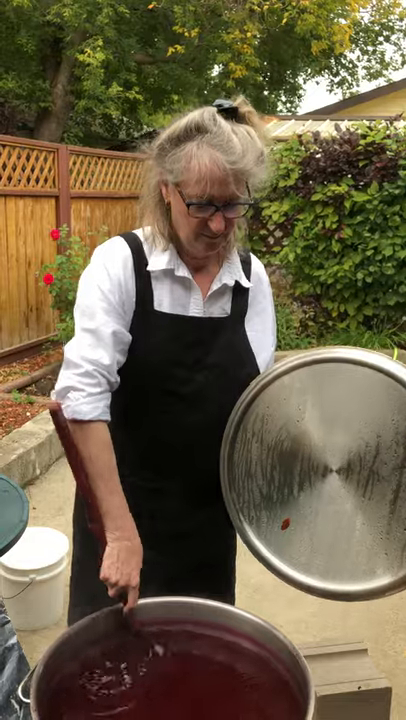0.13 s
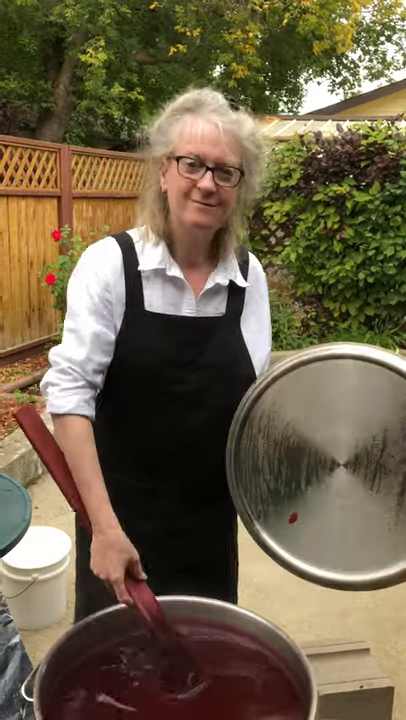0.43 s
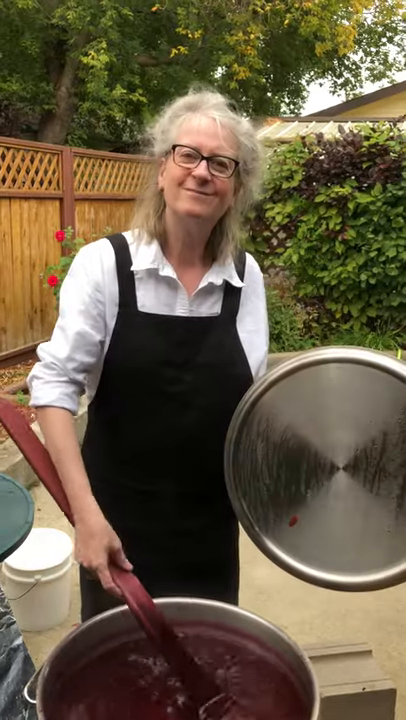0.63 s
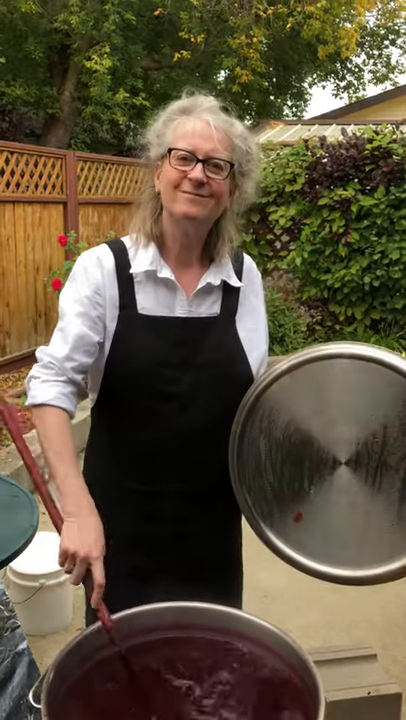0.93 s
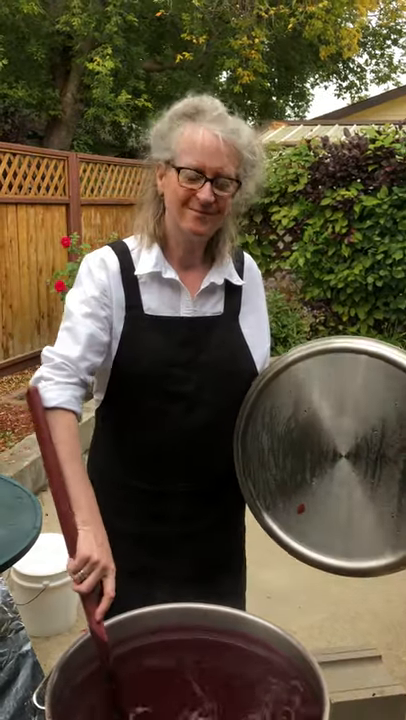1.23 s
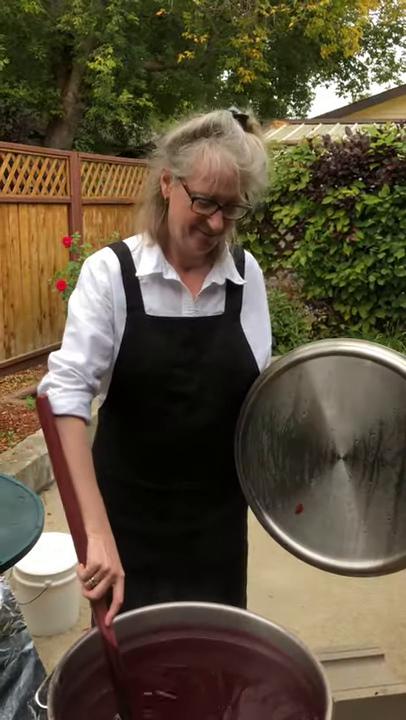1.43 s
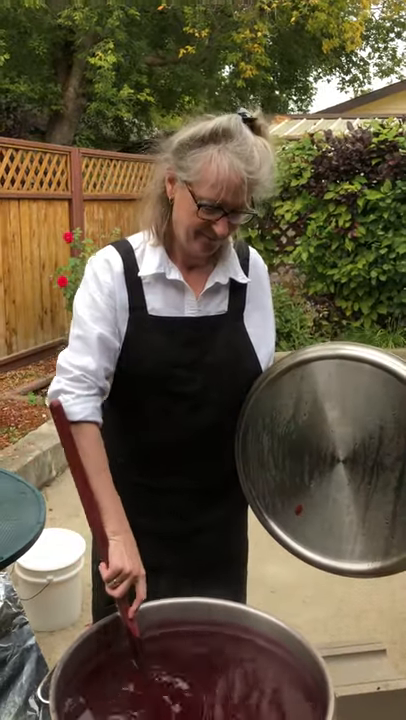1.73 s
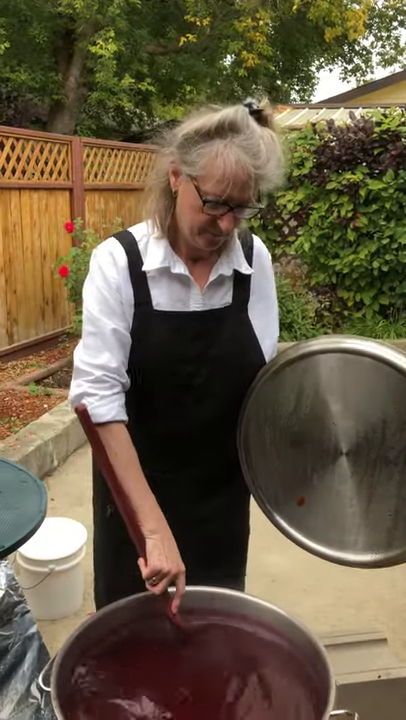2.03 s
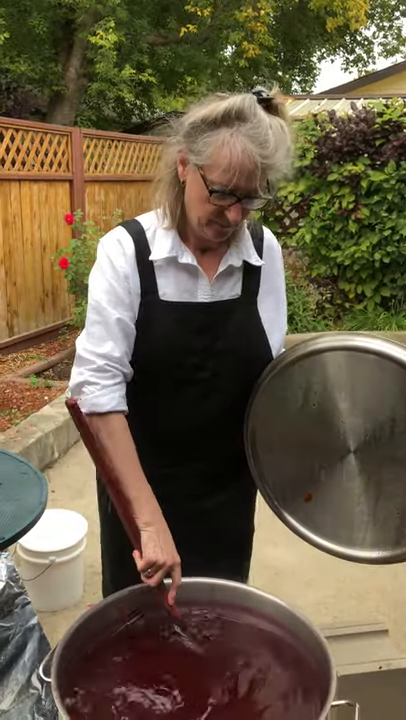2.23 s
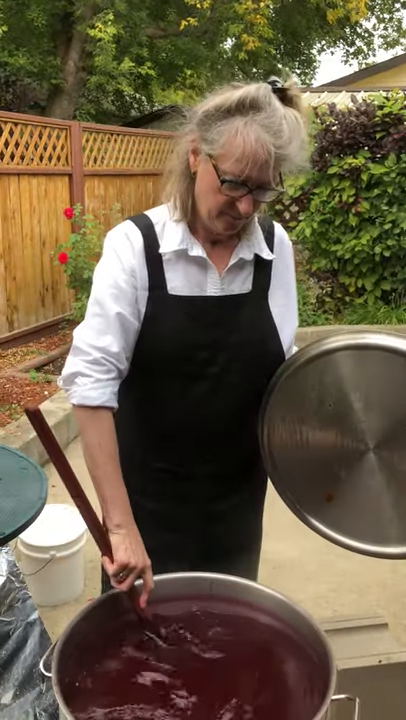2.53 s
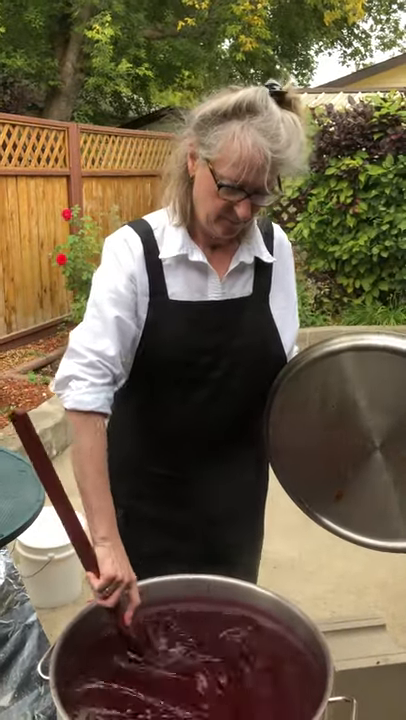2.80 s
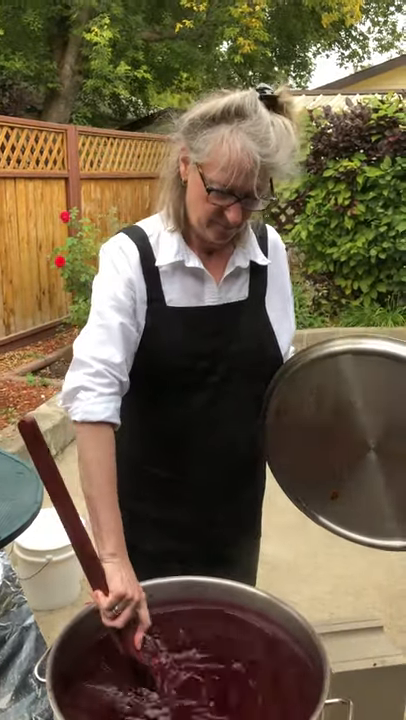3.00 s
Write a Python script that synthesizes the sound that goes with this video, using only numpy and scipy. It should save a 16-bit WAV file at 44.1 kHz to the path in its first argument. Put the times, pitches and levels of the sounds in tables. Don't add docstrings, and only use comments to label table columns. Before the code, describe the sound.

Close to the microphone, liquid in a wide metal pot is stirred in a yard, bubbling and dripping, nearly pausing midway, then splashing again, while a gas flame rumbles and softly hisses underneath throughout.

```python
import sys
import numpy as np
from scipy import signal
from scipy.fft import rfft, irfft
from scipy.io import wavfile
from scipy.ndimage import uniform_filter1d

SR = 44100
rng = np.random.default_rng(int(sys.argv[2]) if len(sys.argv) > 2 else 0)


def nominal_scale(level):
    x = np.asarray(level, float) / 20
    return 10 ** x


def to_wav(sig):
    pcm = np.clip(np.atleast_2d(sig), -1, 1) * 32767
    pcm = np.round(pcm).astype(np.int16)
    wavfile.write(sys.argv[1], SR, pcm.T)


N = 139356

# frequency in Hz, level in dB per Hz.
ROAR_SPECTRUM = [(15, -74), (25, -41), (59, 3), (139, -27), (173, 0.5), (528, -12.5), (682, -16),
                 (1180, -24), (1500, -29.5), (1950, -58), (3300, -120)]
# frequency in Hz, width in Hz, level in dB rms.
HOLLOWS = [(71.8, 23, -58), (121.9, 21, -57), (196.34, 50, -45.5), (242.5, 45, -50.5), (377.7, 37, -60),
           (573, 27, -60.5), (691, 71, -56.5), (792.4, 63, -61.5)]
# frequency in Hz, level in dB per Hz.
HISS_SPECTRUM = [(500, 1), (900, -14), (1400, 4), (2800, -4), (5000, -3.5), (6400, -8), (8000, -13),
                 (12000, -24), (17500, -26)]
# time in seconds, level in dB.
DRAUGHT = [(.09, 3), (.24, -2), (.63, 0), (1.2, -2), (1.75, 0), (2.24, 2.2), (2.36, -3.5), (2.55, -0.5),
           (2.83, 3), (3.16, 4.5)]
# time in seconds, agitation in dB.
STIR = [(.08, 0), (.3, 7.5), (.5, 4), (.9, 9.5), (1.15, 8), (1.4, -4), (1.7, -16), (1.95, 5.5), (2.2, 5.5),
        (2.5, 1.5), (2.8, 6.5), (3.16, 7.5)]
# start in seconds, peak in dB, pitch in Hz, 60 dB decay in seconds.
GULPS = [(0.203, -50, 1180, 0.047), (0.2599, -45.5, 1070, 0.046), (0.3227, -45.5, 1210, 0.063),
         (0.7113, -44, 1460, 0.036), (0.783, -38.5, 1384, 0.035), (0.854, -35.5, 1210, 0.024),
         (0.9257, -43, 1590, 0.05), (0.9438, -40, 1650, 0.018), (2.3534, -44, 1140, 0.033),
         (2.6334, -44.5, 1135, 0.03), (2.7476, -48, 1084, 0.094), (2.9437, -51, 1410, 0.03),
         (3.022, -44, 1650, 0.031), (3.0719, -50, 1590, 0.038), (0.5397, -45, 2230, 0.039),
         (0.6868, -53, 1820, 0.017), (0.9617, -44, 2040, 0.018), (2.9372, -49, 2040, 0.022),
         (3.1238, -52, 2430, 0.022)]
# start in seconds, peak in dB, pitch in Hz, 60 dB decay in seconds.
PLINKS = [(0.8627, -43.5, 2860, 0.014), (0.904, -42, 3020, 0.0074), (1.038, -44, 3800, 0.012),
          (1.328, -46, 3320, 0.0094), (1.9599, -39.5, 4130, 0.0096), (2.386, -47, 3600, 0.015),
          (2.5148, -43.5, 2740, 0.012), (2.5236, -46, 2320, 0.013), (2.5915, -46, 4220, 0.01),
          (2.6723, -30, 3560, 0.0079), (2.6765, -48, 2950, 0.014), (2.7127, -38, 3400, 0.013),
          (2.7443, -45, 3330, 0.014), (2.818, -46.5, 2890, 0.044), (3.0195, -43, 2650, 0.018),
          (0.3686, -47, 4630, 0.009), (0.5995, -48, 4700, 0.011), (0.9238, -40.5, 5020, 0.0099),
          (0.9657, -36, 4300, 0.0062), (2.5326, -46, 5740, 0.0071), (2.5606, -46, 6530, 0.0076),
          (2.7651, -43, 5560, 0.0075), (2.8968, -46, 5850, 0.013), (2.8975, -47, 2930, 0.012),
          (2.9545, -50, 2800, 0.01), (2.9375, -53, 5200, 0.01), (3.0835, -51, 6760, 0.008),
          (3.0998, -58, 7750, 0.0055), (0.7255, -53, 5640, 0.008), (1.2485, -48, 4240, 0.008)]
# start in seconds, peak in dB, pitch in Hz, 60 dB decay in seconds.
SLAPS = [(0.1476, -39.5, 4500, 0.004), (0.7781, -32, 4250, 0.0056), (1.0976, -32, 4430, 0.0049),
         (1.1044, -16, 4700, 0.002), (2.0348, -41, 6500, 0.0043), (2.0348, -23.5, 5450, 0.0021),
         (2.6309, -38.5, 6300, 0.004), (2.9467, -39, 5140, 0.0029), (3.0804, -38.5, 3070, 0.0052),
         (3.1283, -49, 4370, 0.0071)]
# start in seconds, peak in dB, colour in Hz, spread in octaves.
TICKS = [(0.2678, -44, 7900, 0.28), (0.9083, -41.5, 7600, 0.21), (0.9657, -46, 7760, 0.39),
         (1.0495, -40.5, 7100, 0.2), (1.1039, -38.5, 7200, 0.25), (1.1797, -40, 15400, 0.46),
         (1.4581, -52, 9930, 0.3), (2.3974, -43.5, 7500, 0.3), (2.5147, -44.5, 7750, 0.37),
         (2.6309, -39, 8500, 0.21), (2.7676, -48, 10900, 0.33), (3.1073, -43, 7500, 0.18),
         (3.1124, -41, 8060, 0.2), (0.6978, -44, 11000, 0.9), (1.0969, -39, 11000, 0.9),
         (1.289, -44, 11000, 0.98), (1.3414, -41, 11000, 1.1), (1.9592, -35, 9000, 1.3),
         (2.0348, -31, 6370, 1.2), (2.0956, -44, 6500, 0.8), (2.142, -48, 6500, 0.96),
         (2.175, -44, 6500, 0.98), (2.3136, -42, 6500, 0.8), (2.8224, -49, 6500, 0.8),
         (0.4155, -53, 11500, 0.3), (0.605, -52, 9000, 0.6), (0.9595, -51, 9000, 0.5),
         (2.0395, -44, 4970, 0.73), (2.0484, -43, 7000, 0.7), (2.24, -50, 5000, 0.4),
         (1.4035, -56, 11000, 0.2), (3.0905, -60, 8000, 0.4)]
# start in seconds, length in seconds, level in dB rms, centre in Hz, spread in octaves.
SHEETS = [
    (.14, .12, -62, 11800, 1.8),
    (2.04, 0.28, -56, 4730, 0.69),
    (2.04, 0.32, -65, 15000, 0.71),
]
# start in seconds, length in seconds, level in dB rms, centre in Hz, spread in octaves.
SPLASHES = [(.26, 0.13, -55.5, 2140, 0.53), (.59, 0.025, -63.5, 5900, 0.38), (.69, 0.3, -61, 1390, 0.22),
            (.77, 0.13, -59, 4600, 0.55), (.89, 0.18, -58.5, 4230, 0.54), (1.105, 0.06, -58.5, 4070, 0.42),
            (2.027, 0.07, -50.5, 4700, 0.73), (2.31, 0.073, -57, 4630, 0.67),
            (2.816, 0.022, -57, 4000, 0.85), (2.91, 0.062, -69, 9900, 0.52), (3.07, 0.32, -70, 6840, 0.48)]
# start in seconds, peak in dB, pitch in Hz.
DROPLETS = [(0.1469, -63, 12400), (0.27, -41, 2270), (0.6882, -48, 2100), (0.6983, -57, 10680),
            (0.7861, -50, 8270), (0.7938, -54, 5340), (0.821, -50, 5000), (0.8282, -55, 8100),
            (0.829, -45, 2930), (0.8943, -44, 2800), (0.899, -48, 3400), (0.9175, -57, 8270),
            (0.956, -43, 3480), (0.9603, -46, 4650), (0.9665, -57, 9470), (0.969, -56, 8610),
            (0.9733, -45, 4100), (1.0492, -56, 12230), (1.0978, -56, 10680), (1.1138, -45, 3960),
            (1.1268, -60, 12580), (2.0357, -51, 10100), (2.04, -41, 6800), (2.0487, -57, 12230),
            (2.0788, -55, 7060), (2.097, -44, 6030), (2.1376, -55, 7240), (2.1431, -47, 5170),
            (2.1434, -60, 12230), (2.1594, -49, 3790), (2.1645, -52, 5170), (2.1717, -48, 5000),
            (2.1772, -54, 9470), (2.1779, -58, 12400), (2.1928, -48, 6370), (2.1953, -61, 11540),
            (2.1993, -52, 7750), (2.2124, -55, 9650), (2.2309, -60, 9650), (2.2599, -52, 9300),
            (2.3143, -47, 4130), (2.3176, -54, 8440), (2.3179, -62, 12060), (2.3245, -48, 3320),
            (2.3368, -61, 10850), (2.3477, -51, 7060), (2.353, -44, 4340), (2.7682, -61, 12580),
            (2.8175, -56, 8790), (3.1125, -62, 12230), (3.1335, -52, 8270), (3.1549, -58, 8790)]

ROAR_DB, HISS_DB = -46.5, -59.5
JET_HZ, JET_WIDTH_HZ, JET_DB = 6300, 310, -77
UPPER_HZ = 300
WANDER, WANDER_PER_S = .018, 6
FLUTTER_DB, FLUTTER_PER_S = .9, 80
MIST_DB, MIST_SHARE = -78, 0.43
FIZZ_DB, FIZZ_PER_S, FIZZ_SPREAD_DB = -70.5, 1200, 1.5
GURGLE_DB, GURGLE_PER_S = -72.5, 260
RISE, SOFT_CYCLES = 0.11, 1.34
DROPLET_CYCLES, SLAP_SOFT_CYCLES = 32, 3.0
TICK_T60_S, SHELF_DB = 0.0094, -28
SPLASH_BED, SHEET_BED = .85, .7
LAG_S = .0007
POT_DB, POT_T60_S = -12, .09
START_S = .084
SELF_DB, ABOVE_DB = -80, -32
EDGE_HZ, LOW_HZ = 17350, 45


def evened(x):
    return x / np.sqrt(np.mean(x ** 2) + 1e-20)


def read(points, hz):
    f, value = np.transpose(points)
    return np.interp(np.log(hz + 1), np.log(f + 1), value)


def follow(points):
    return np.interp(np.arange(N) / SR, *np.transpose(points))


def add(mix, s, sound):
    part = mix[round(s * SR):][:len(sound)]
    part += sound[:len(part)]


def hump(x, hz, octaves):
    f = np.fft.rfftfreq(len(x), 1 / SR) + 1
    bell = np.exp(-.5 * (np.log2(f / hz) / octaves) ** 2)
    gain = np.maximum(bell, nominal_scale(SHELF_DB) * (f > hz))
    return evened(irfft(rfft(x) * gain, len(x)))


def drift(per_s):
    t = np.arange(N) / SR
    rates = per_s * np.geomspace(.1, 1, num=24)
    return evened(sum(np.sin(2 * np.pi * (f * t + rng.random())) / np.sqrt(f) for f in rates))


def wash(spectrum, patchy_db, flicker_db):
    frames, hz = N // 256 + 5, np.fft.rfftfreq(1024, 1 / SR)
    a, b, patches = rng.standard_normal((frames, 513, 3)).T
    patches = uniform_filter1d(patches, size=12, axis=0)
    patches = evened(uniform_filter1d(patches, size=10, axis=1))
    flicker = evened(uniform_filter1d(rng.standard_normal(frames), size=3))
    level_db = read(spectrum, hz)[:, None] + patchy_db * patches + flicker_db * flicker
    z = (a + 1j * b) * nominal_scale(level_db)
    return evened(signal.istft(z, nperseg=1024, noverlap=768)[1][:N])


def hollow(hz, width):
    f = np.fft.fftfreq(N, 1 / SR)
    noise = rng.standard_normal(N) + 1j * rng.standard_normal(N)
    envelope = np.fft.ifft(np.fft.fft(noise) / (1 + (2 * f / width) ** 2))
    pitch = hz * (1 + WANDER * drift(WANDER_PER_S))
    return evened((envelope * np.exp(2j * np.pi * np.cumsum(pitch) / SR)).real)


def jet():
    f = np.fft.rfftfreq(N, 1 / SR)
    resonance = 1 / (1 + (2 * (f - JET_HZ) / JET_WIDTH_HZ) ** 2)
    return evened(irfft(rfft(rng.standard_normal(N)) * resonance, N))


def burner():
    draught_db = follow(DRAUGHT)
    roar = nominal_scale(ROAR_DB) * wash(ROAR_SPECTRUM, 0.22, 0.19)
    for hz, width, db in HOLLOWS:
        roar += nominal_scale(db + draught_db * (hz > UPPER_HZ)) * hollow(hz, width)
    flutter = nominal_scale(FLUTTER_DB * drift(FLUTTER_PER_S))
    return roar * flutter + nominal_scale(HISS_DB) * wash(HISS_SPECTRUM, 1.96, 0.22) + nominal_scale(JET_DB) * jet()


def mist():
    level_db = MIST_DB + MIST_SHARE * follow(STIR) + 3.7 * drift(5.4)
    return nominal_scale(level_db) * hump(rng.standard_normal(N), 12400, 0.62)


def bubble(db, hz, t60):
    t = np.arange(3000) / SR
    tone = np.sin(2 * np.pi * hz * t * (1 - RISE / 2 + RISE * np.minimum(t / t60, 1)))
    onset = 1 - np.exp(-t * hz / SOFT_CYCLES)
    return nominal_scale(db - 60 * t / t60) * onset * tone * 1.26


def swarm(db, per_s, hz_range, cycles):
    size = nominal_scale(FIZZ_SPREAD_DB * np.minimum(rng.exponential(1, N), 3))
    births = size * (rng.random(N) < per_s / SR)
    kind, out = rng.integers(0, 24, N), np.zeros(N)
    for k, hz in enumerate(np.geomspace(*hz_range, num=24)):
        ring = bubble(-1.8 * np.log2(hz / 1000), hz, cycles / hz)
        out += signal.oaconvolve(births * (kind == k), ring)[:N]
    return evened(out) * nominal_scale(db + follow(STIR))


def fizz():
    tiny = swarm(FIZZ_DB, FIZZ_PER_S, (1500, 11000), 32)
    return tiny + swarm(GURGLE_DB, GURGLE_PER_S, (1100, 4200), 55)


def droplet(db, hz):
    return bubble(db + 2.4 * np.log2(hz / 2500), hz, DROPLET_CYCLES / hz)


def tick(db, hz, octaves):
    t = np.arange(512) / SR
    spray = 0.14 * rng.standard_normal(512) * nominal_scale(-60 * t / TICK_T60_S)
    snap = hump((np.arange(512) == 40) + spray, hz, octaves)
    return nominal_scale(db) * snap / abs(snap).max()


def slap(db, hz, t60):
    t = np.arange(3000) / SR
    swell = np.sin(np.pi / 2 * np.minimum(t * hz / SLAP_SOFT_CYCLES, 1))
    return bubble(db, hz, t60) * swell * 2


def splash(length, db, hz, octaves, lean=0.41, bed=SPLASH_BED):
    noise = rng.standard_normal(12000)
    impacts = nominal_scale(1.2 * np.minimum(rng.exponential(1, 12000), 3)) * (rng.random(12000) < 600 / SR)
    drops = signal.lfilter([1], [1, -np.exp(-1 / 40)], impacts)
    u = np.minimum(np.arange(12000) / SR / length, 1)
    swell = np.sin(np.pi * u ** lean) ** 1.38
    return nominal_scale(db) * swell * hump(noise * (bed + drops), hz, octaves)


def sheet(length, db, hz, octaves):
    return splash(length, db, hz, octaves, lean=0.88, bed=SHEET_BED)


def pot(x):
    t = np.arange(6000) / SR
    echoes = rng.choice([-1., 1.], 6000) * (rng.random(6000) < .06)
    tail = echoes * nominal_scale(-60 * t / POT_T60_S) * (t > .002)
    return x + nominal_scale(POT_DB) * signal.oaconvolve(x, tail / np.linalg.norm(tail))[:N]


def stirred_liquid():
    liquid = fizz()
    for rows, voice in ((GULPS, bubble), (PLINKS, bubble), (SLAPS, slap),
                        (TICKS, tick), (SHEETS, sheet), (SPLASHES, splash)):
        for s, *row in rows:
            add(liquid, s + LAG_S, voice(*row))
    for s, *row in DROPLETS:
        add(liquid, s, droplet(*row))
    return liquid


def scene():
    return (pot(stirred_liquid()) + burner() + mist())[None]


def band_limit(x):
    return signal.sosfilt(signal.butter(12, 18470, fs=SR, output="sos"), x)


def record(dry):
    f = np.fft.rfftfreq(N, 1 / SR)
    band = (f < EDGE_HZ) * f ** 2 / (f ** 2 + LOW_HZ ** 2) + nominal_scale(ABOVE_DB) * (f >= EDGE_HZ)
    noisy = dry + nominal_scale(SELF_DB) * rng.standard_normal(N)
    heard = irfft(rfft(noisy) * band, N)
    return band_limit(heard * (np.arange(N) >= START_S * SR))


dry = scene()
out = record(dry)
to_wav(out)
```